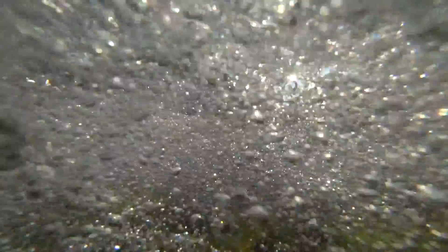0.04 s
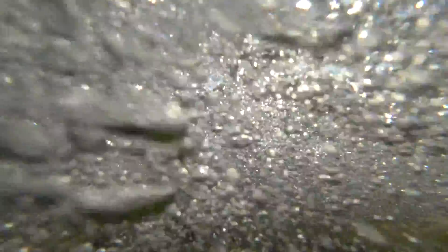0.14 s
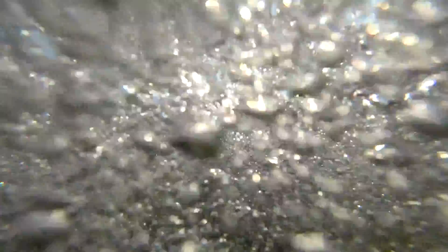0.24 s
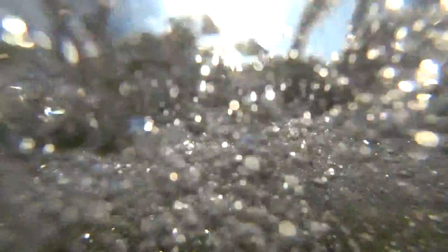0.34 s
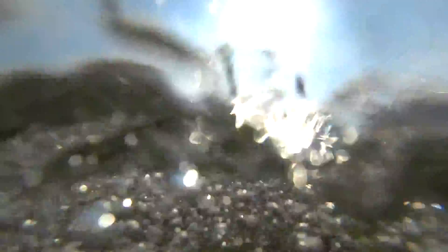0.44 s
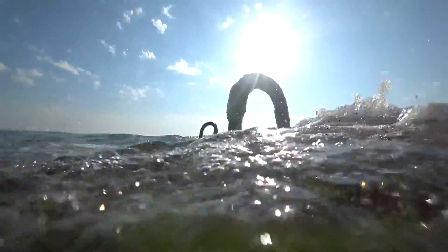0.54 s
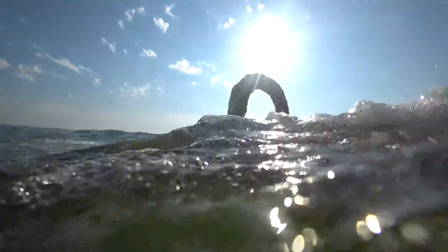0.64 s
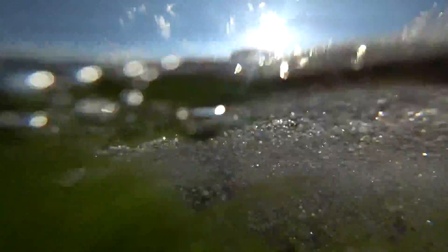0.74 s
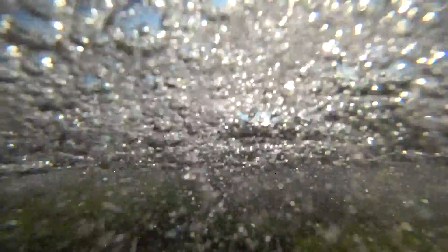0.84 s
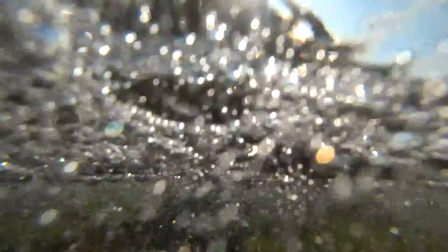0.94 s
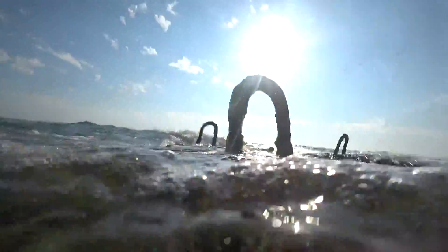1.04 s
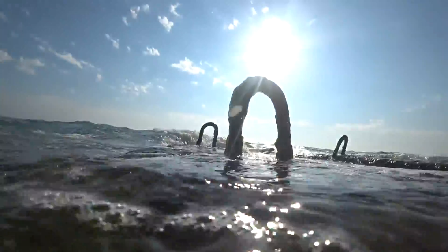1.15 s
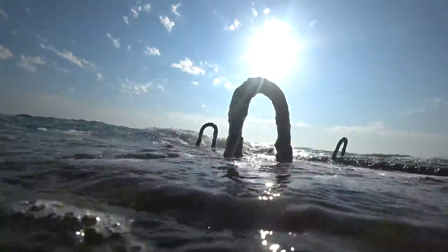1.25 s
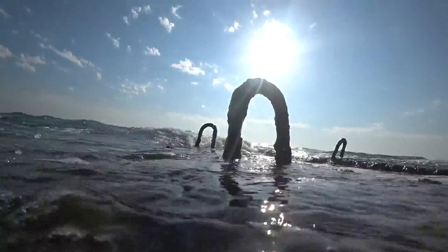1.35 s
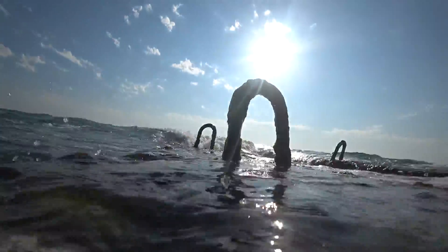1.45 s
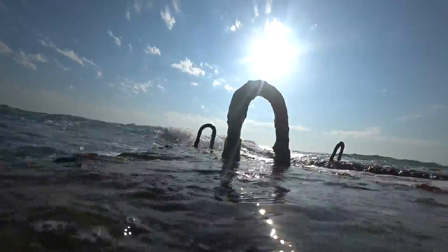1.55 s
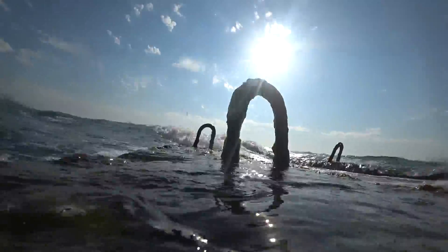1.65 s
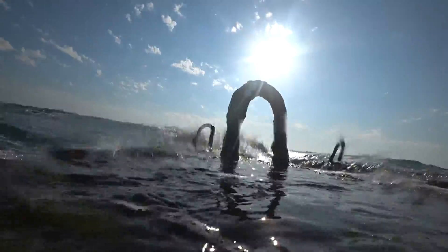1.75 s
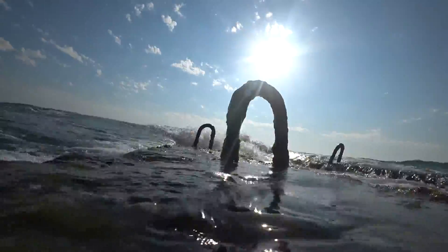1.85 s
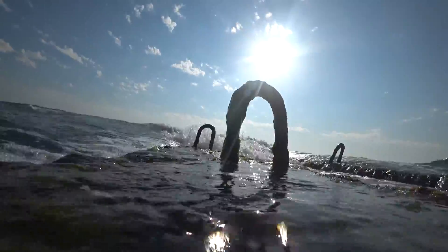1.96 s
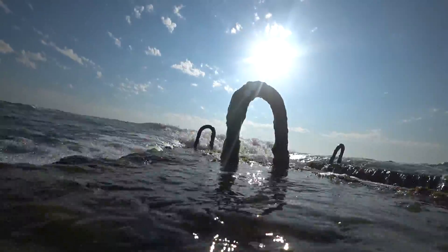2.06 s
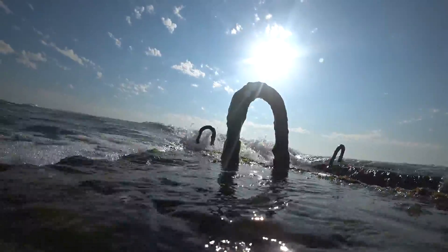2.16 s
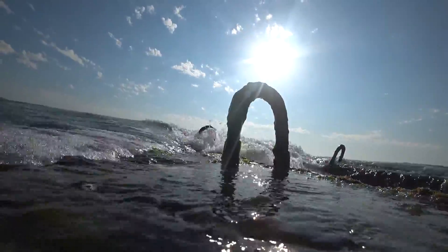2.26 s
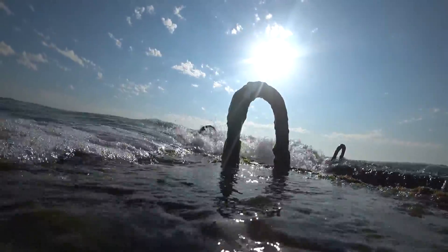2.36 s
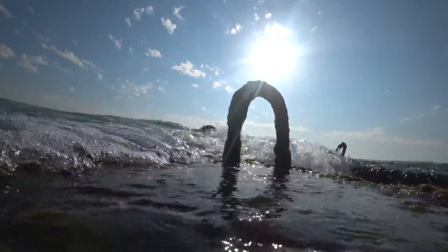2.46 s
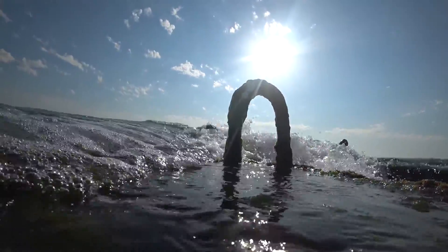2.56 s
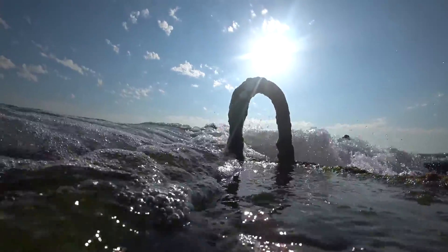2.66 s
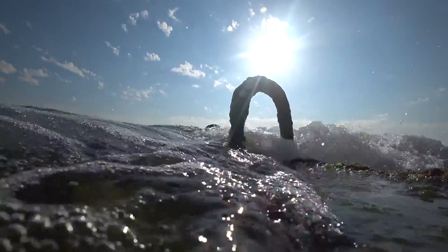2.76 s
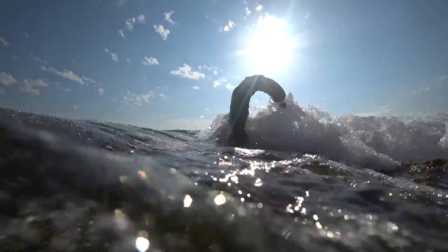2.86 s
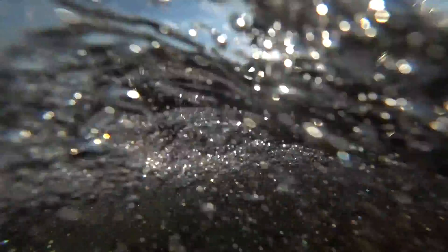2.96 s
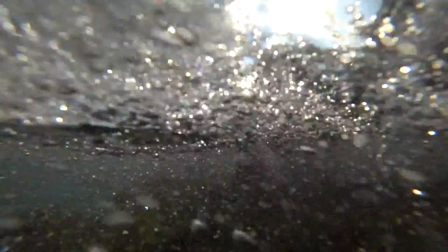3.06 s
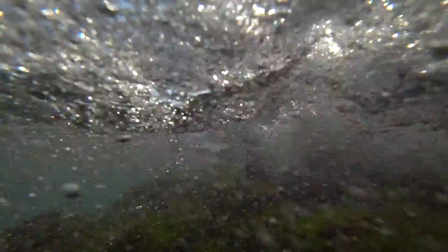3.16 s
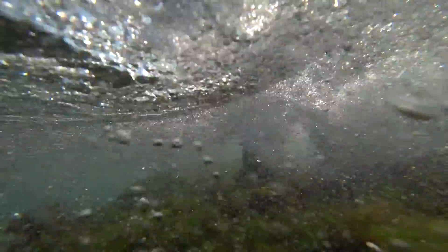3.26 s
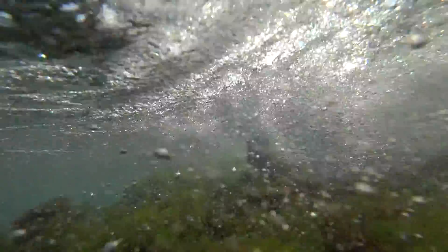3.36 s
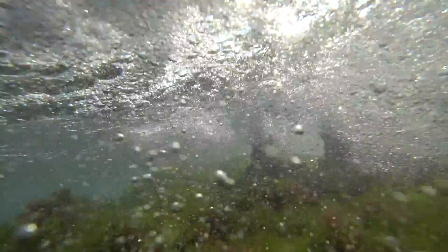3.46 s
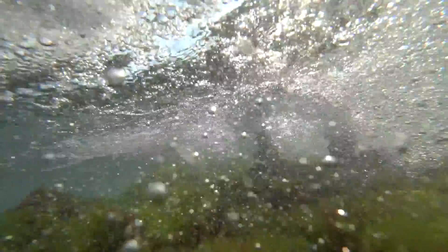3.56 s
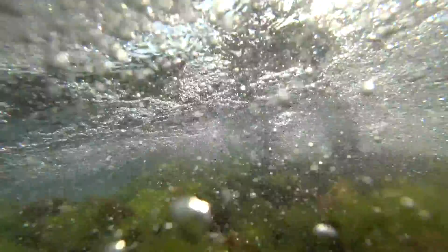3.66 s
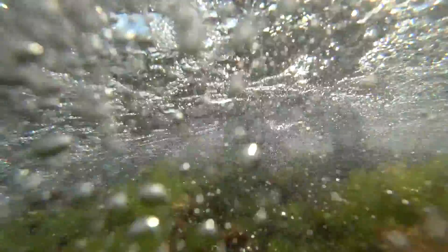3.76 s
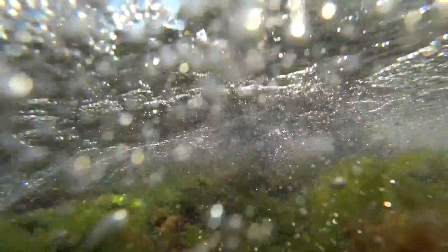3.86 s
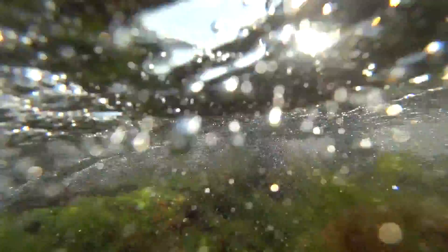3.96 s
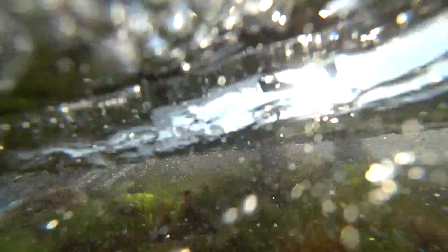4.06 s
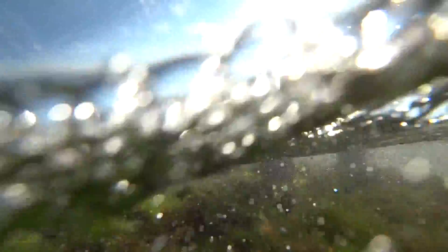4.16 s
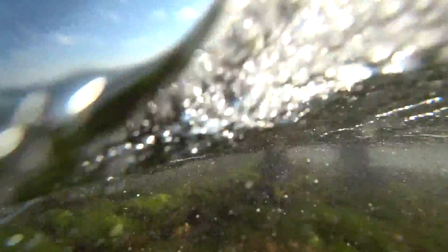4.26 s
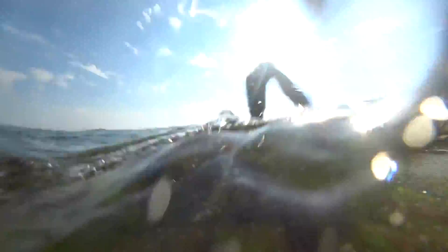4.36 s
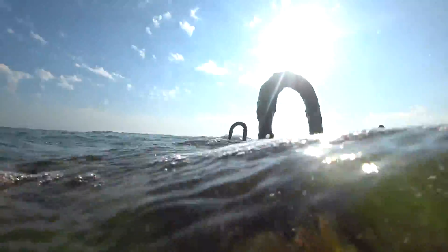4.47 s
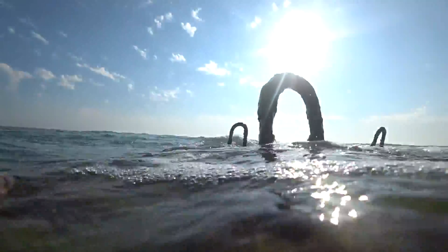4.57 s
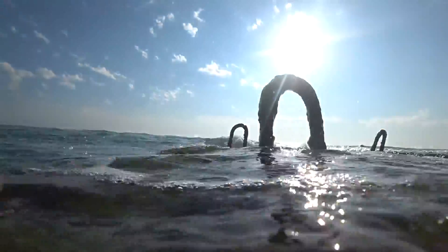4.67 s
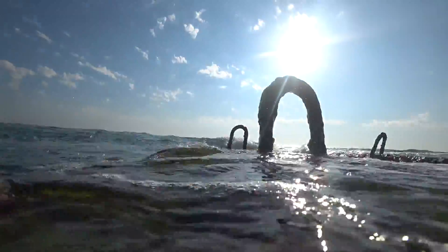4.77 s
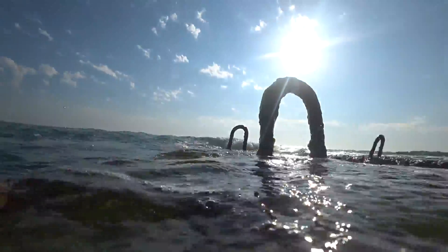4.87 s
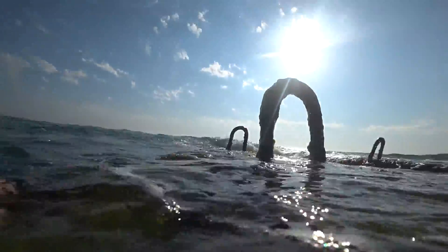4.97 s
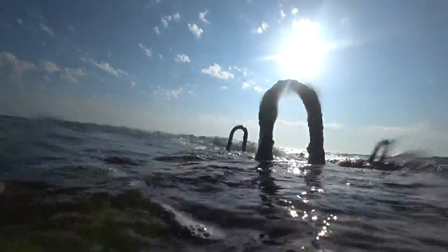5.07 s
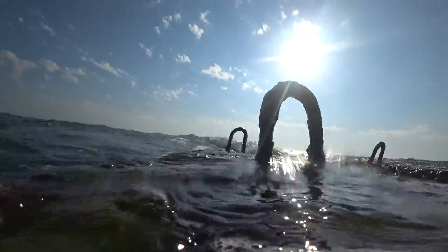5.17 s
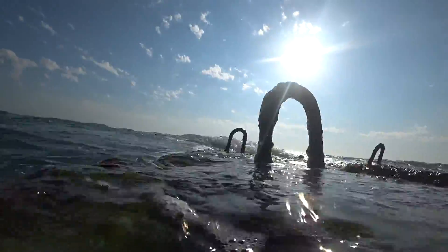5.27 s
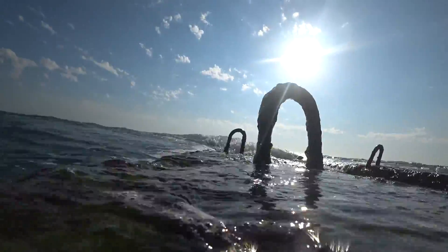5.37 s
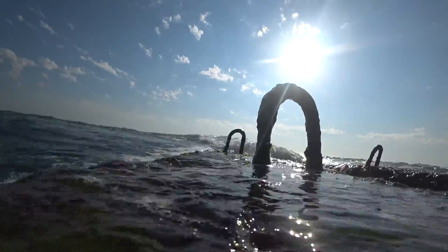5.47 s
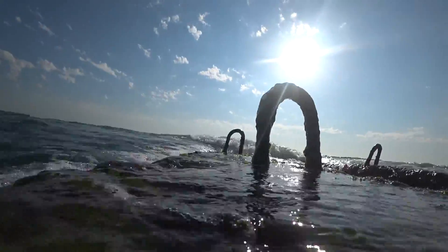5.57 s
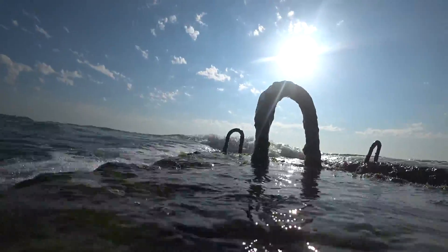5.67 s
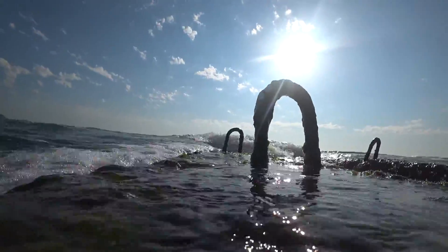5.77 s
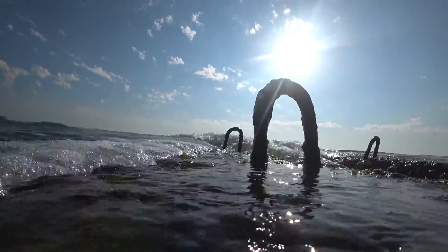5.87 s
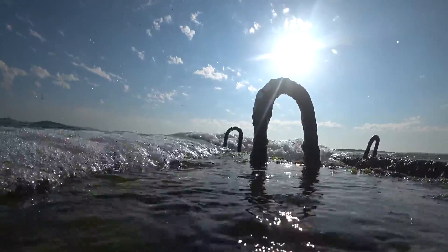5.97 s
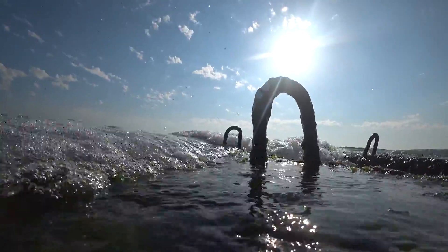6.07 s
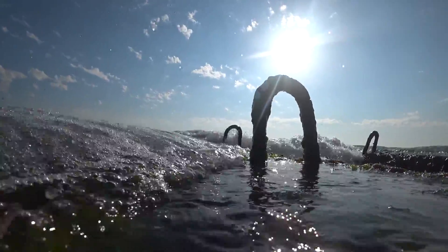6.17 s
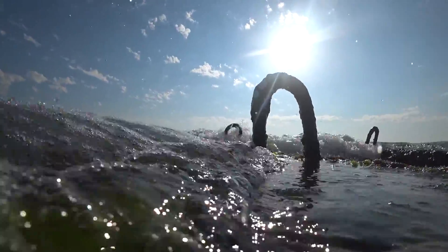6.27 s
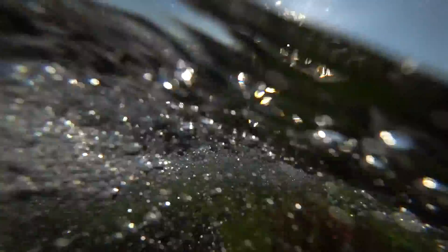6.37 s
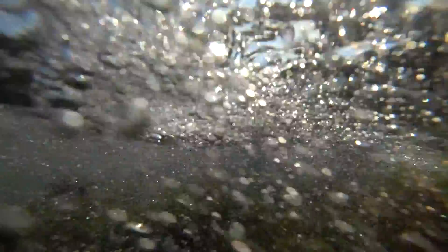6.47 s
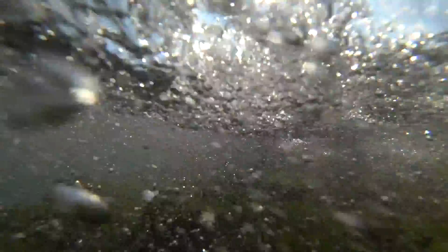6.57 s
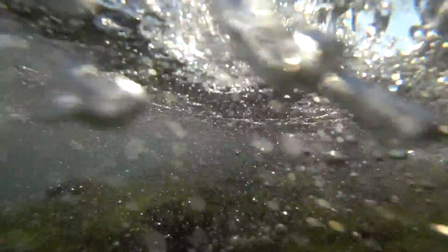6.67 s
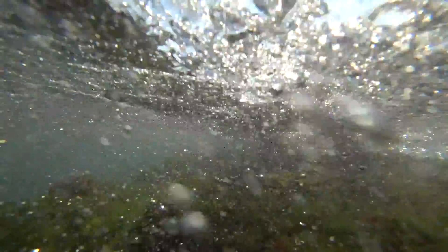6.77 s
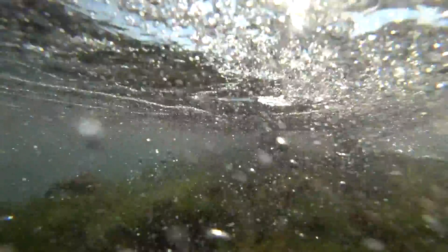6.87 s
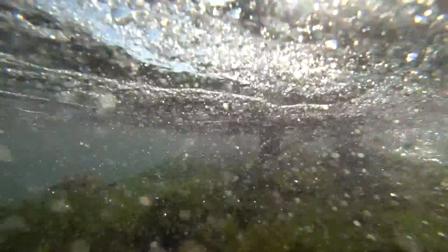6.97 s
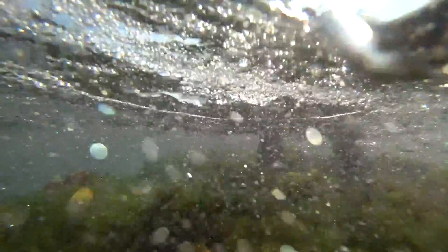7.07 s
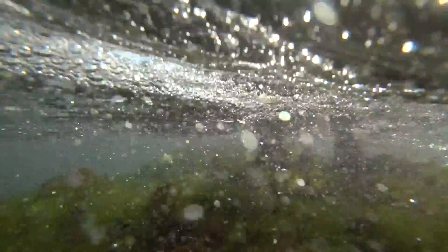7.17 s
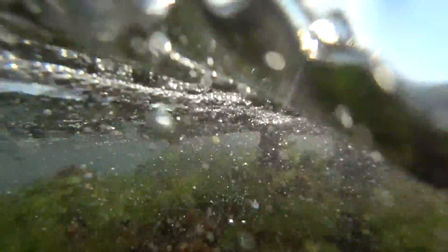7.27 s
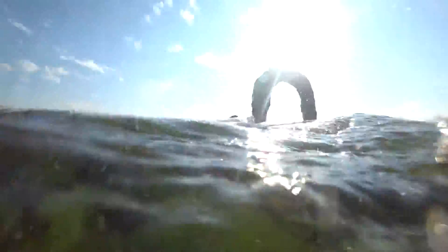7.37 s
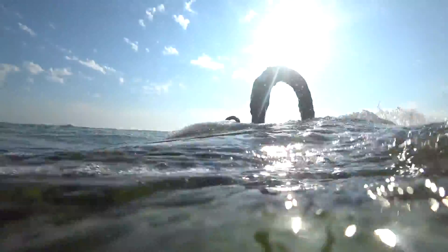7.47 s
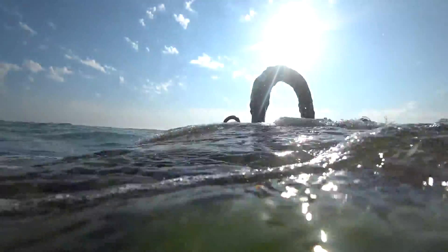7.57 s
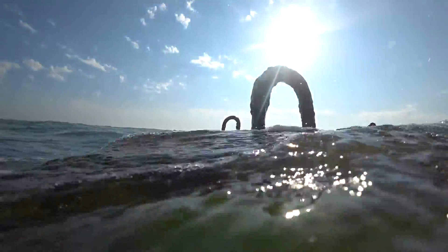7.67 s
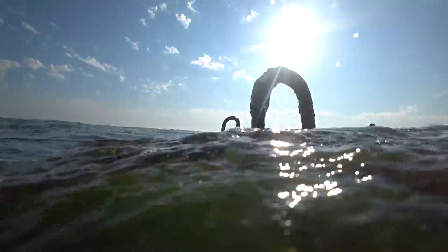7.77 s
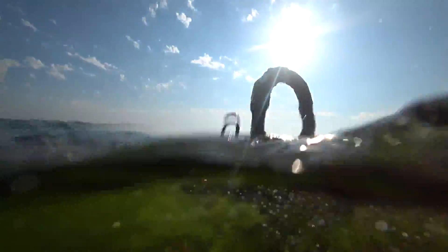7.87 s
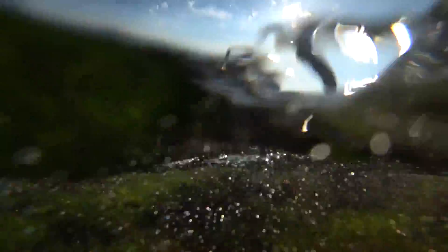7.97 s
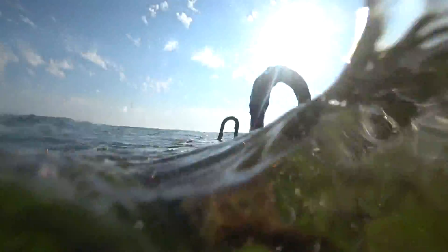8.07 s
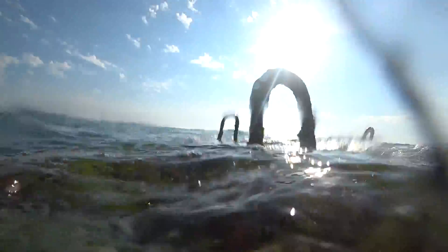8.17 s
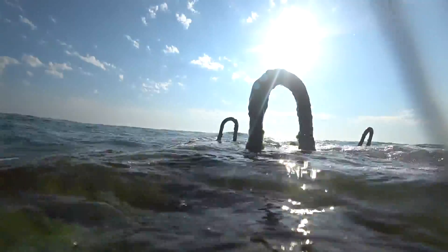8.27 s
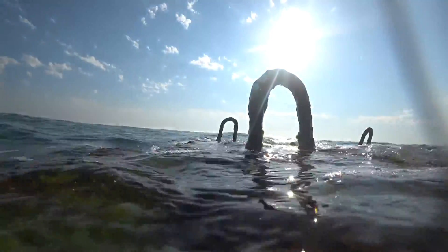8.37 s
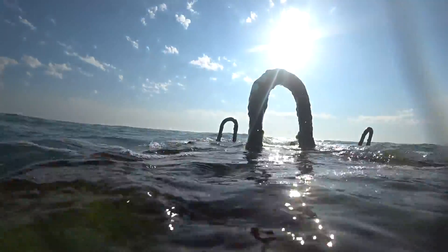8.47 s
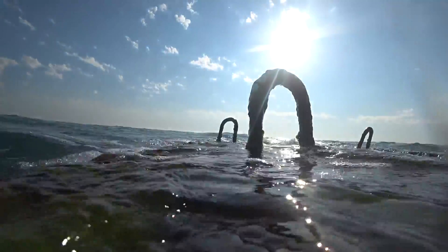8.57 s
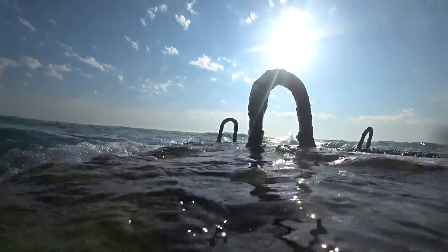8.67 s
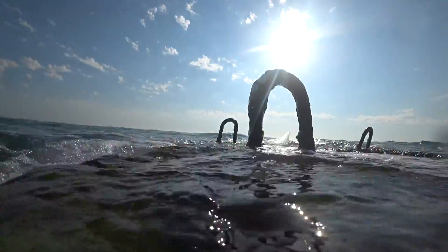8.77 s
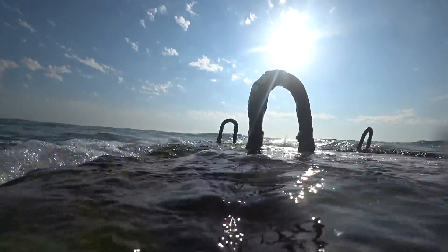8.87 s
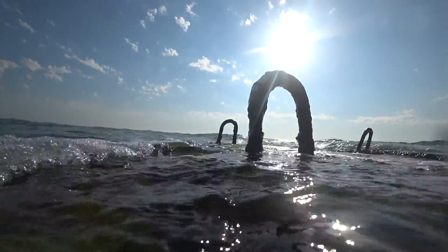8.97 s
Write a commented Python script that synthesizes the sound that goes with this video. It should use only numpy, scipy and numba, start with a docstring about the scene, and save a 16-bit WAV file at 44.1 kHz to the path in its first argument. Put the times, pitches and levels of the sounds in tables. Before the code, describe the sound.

A sealed camera sits at the waterline of a weedy, rocky shore, hearing through its case. At 0 s it is already submerged: a wave front bursts, with throaty mid-pitched gurgles, fizz and bright ticks, thinning by 0.6 s. A brief glug and splash at 0.85-1.2 s ends in a knock. Then quiet until 2.8 s: low swell rumble, faint boxy surf and hiss. From 2.9 s a big surge gurgles densely, strongest near 3.3 s, fading by 3.8 s. Two heavy, overloading thumps hit around 4.2 s with scattered bubbles, and a pocket sweeps upward near 4.5 s. Water drains with thin, sagging singing; small slaps land at 5.1-5.6 s. At 6.3 s another front crashes, slaps and boils with fizz and sharp snaps until about 7.4 s. After a lull, short glugs and a tick at 8 s give way to muffled calm and faint draining to about 9 s.

```python
"""Rocks at the waterline, where small waves break and wash over a sealed camera; it hears through its case.
Under water, crowds of air pockets gurgle and small bubbles tick on the case: damped sines that mostly
climb in pitch. Wave fronts burst on it as coloured noise, water slaps it, and runs off with a thin singing.
Between surges the far surf hums in the case's resonances and the swell rumbles, both filtered noise.
The camera widens its stereo and clips."""
import sys
import numpy as np
from scipy import signal
from scipy.fft import rfft, irfft, next_fast_len
from scipy.io import wavfile
from scipy.ndimage import map_coordinates
from numba import njit

SR = 44100
rng = np.random.default_rng(int(sys.argv[2]) if len(sys.argv) > 2 else 0)


def volts_from_db(level):
    """Convert decibel levels to linear amplitude ratios."""
    exponent = np.asarray(level, float) / 20
    return 10 ** exponent


def wav_out(sig):
    """Save sig, one row per channel (or a flat mono array), as 16-bit PCM at SR to the path in sys.argv[1]."""
    wavfile.write(sys.argv[1], SR, np.round(np.clip(np.atleast_2d(sig).T, -1, 1) * 32767).astype(np.int16))


N = 397782  # samples

# surges over the camera, one list each:
# (time [s], gurgle level before clumping [dB], centre pitch of the pockets [Hz], fizz level [dB])
SURGES = [
    [(0.0, -28.5, 536, -43.5), (0.03, -28, 670, -43), (0.122, -30, 776, -60), (0.214, -30, 552, -48.5),
     (0.306, -28.5, 611, -53), (0.468, -43.5, 700, -66), (0.6, -63, 654, -63)],
    [(0.84, -48, 610, -58), (0.922, -65, 670, -75), (0.95, -41, 460, -60), (1.14, -54, 680, -61)],
    [(2.86, -74, 654, -62), (2.936, -37.5, 535, -37.5), (3.056, -44, 593, -46.5), (3.142, -31, 465, -36),
     (3.306, -22, 644, -43.5), (3.34, -22.5, 520, -41.5), (3.508, -33, 644, -55), (3.64, -42.5, 550, -69),
     (3.82, -53, 700, -67)],
    [(4.05, -58, 630, -82), (4.128, -47.5, 835, -54.5), (4.222, -56, 530, -52), (4.328, -58, 867, -52.5),
     (4.412, -50, 570, -54.5), (4.55, -51, 804, -72)],
    [(6.29, -85, 535, -68), (6.394, -72, 653, -51), (6.456, -42, 464, -37), (6.5, -34.5, 610, -38.5),
     (6.558, -28, 507, -40.5), (6.716, -27, 648, -33.5), (6.814, -28, 555, -39.5), (7.13, -41.5, 609, -52),
     (7.16, -39, 835, -55), (7.4, -50, 686, -55)],
    [(7.92, -63, 660, -60), (8.096, -60.5, 660, -65), (8.164, -56, 750, -65), (8.22, -59, 613, -75)],
]
# the sea between surges, one list for each lull:
# (time [s], swell rumble [dB], low surf [dB], ring of the case [dB], hiss [dB]), before any flicker
SEA = [
    [(0.6, -46, -57, -63, -61), (0.646, -44.5, -54, -61, -58), (0.892, -42.5, -56.5, -69, -50.5),
     (1.0, -48, -53.5, -67, -60)],
    [(1.27, -48, -54, -63.5, -59), (1.56, -49.5, -58.5, -56, -61), (2.392, -45.5, -60.5, -67, -62.5),
     (2.78, -47, -57.5, -60, -60.5)],
    [(3.86, -42.5, -53, -70, -67), (3.964, -41.5, -54.5, -67, -63), (4.03, -41, -55, -72, -59.5)],
    [(4.58, -43, -57.5, -66, -65), (4.854, -45, -58, -66, -63), (4.984, -42, -50, -61, -63.5),
     (5.08, -44, -56.5, -54, -59.5)],
    [(5.32, -45, -55.5, -58.5, -63), (5.53, -48, -59, -62.5, -65), (5.76, -44, -56.5, -57.5, -60),
     (6.27, -50, -59.5, -60.5, -61)],
    [(7.45, -43, -57, -73, -64), (7.644, -45, -61, -68, -62), (7.75, -49.5, -57.5, -62, -60),
     (7.88, -47.5, -56, -61, -63)],
    [(8.28, -42.5, -59.5, -74, -64.5), (8.552, -49.5, -60, -59.5, -62), (8.748, -51, -65, -60.5, -62.5),
     (9.02, -48, -59, -64, -63)],
]
# water heaving against the case: (time of the peak [s], rumble [dB], slosh [dB])
HEAVES = [(.06, -36.5, -29.5), (0.942, -38.5, -30.5), (1.21, -32.5, -44), (2.915, -32.5, -29),
          (3.14, -27.5, -25), (3.24, -55, -46), (4.187, -26.5, -30), (4.65, -48, -91), (5.22, -43, -60),
          (5.57, -40, -62), (6.37, -22, -26.5), (8.015, -41, -34.5)]
# colour of the churn and of a wave front's body: (frequency [Hz], relative level per Hz [dB])
BODY_COLOUR = [(180, -52.5), (300, -14.5), (624, 4.5), (670, 2), (1420, -7.5), (2600, -45), (3380, -56),
               (5720, -120)]
# colour of the fizz, as the case passes it: (frequency [Hz], relative level per Hz [dB])
FIZZ_COLOUR = [(880, -59), (1500, 3), (1680, -15.5), (1980, -0.5), (2330, -11), (2730, -3), (3720, -11),
               (4250, -3.5), (5050, -4), (9000, -30.5), (11700, -54), (19800, -120)]
# colour of the spray: (frequency [Hz], relative level per Hz [dB])
SPRAY_COLOUR = [(4710, -7.5), (8000, -3), (9100, -13), (9810, -2), (10300, 2), (11300, -10), (12000, -16),
                (15600, -57), (22000, -120)]
# colour of the swell's rumble: (frequency [Hz], relative level per Hz [dB])
RUMBLE_COLOUR = [(12, 0.5), (20, 7), (29, 5.5), (82, -8.5), (134, -18.5), (162, -20), (250, -25),
                 (320, -24), (550, -120)]
STRONG_DB = -26  # a strong gurgle


def unit(x):
    """Scaled to rms 1."""
    return x / np.sqrt(np.mean(x ** 2) + 1e-20)


def along(points, hz):
    """Reads (Hz, value) points on a log frequency axis."""
    f, v = np.transpose(points)
    return np.interp(np.log(hz + 1), np.log(f + 1), v)


def curves(rows):
    """One value per sample for each column after the time."""
    s, *columns = np.transpose(rows)
    return [np.interp(np.arange(N) / SR, s, column) for column in columns]


def during(tables):
    """1 inside each table's time span, with a 1 ms fade in and a 20 ms fade out."""
    t = np.arange(N) / SR
    gain = np.zeros(N)
    for rows in tables:
        first, last = rows[0][0], rows[-1][0]
        gain += np.interp(t, [first, first + 0.00093, last - 0.02, last], [0, 1, 1, 0], 0, 0)
    return gain


def humps(s, db, rise_s, fall_s):
    """Summed gains that climb 40 dB to each peak and sink 40 dB after it."""
    t = np.arange(N) / SR
    gain = np.zeros(N)
    for at, peak, up, down in np.broadcast(s, db, rise_s, fall_s):
        level_db = np.interp(t, [at - up, at, at + down], [peak - 40, peak, peak - 40], -200, -200)
        gain += volts_from_db(level_db)
    return gain


def wobble(rate):
    """A smooth random curve, rate knots a second."""
    return map_coordinates(rng.standard_normal(int(N * rate / SR) + 4), [np.arange(N) * rate / SR])


def filtered(x, response):
    """x times a complex response of frequency."""
    m = next_fast_len(N + SR // 2)
    return irfft(rfft(x, m) * response(np.fft.rfftfreq(m, 1 / SR)), m)[..., :N]


def coloured(x, colour):
    """x filtered by a table of (Hz, dB)."""
    return filtered(x, lambda hz: volts_from_db(along(colour, hz)))


def rush(colour, flicker_db, rate):
    """Coloured noise of rms 1 whose level flickers."""
    x = coloured(rng.standard_normal(N), colour)
    return unit(x * volts_from_db(flicker_db * wobble(rate)))


@njit
def bubbles(start, hz, t60, gain, rise, attack, sr, n):
    """Damped sines with a short attack whose pitch drifts by 2 * rise of itself as they die 60 dB."""
    out = np.zeros(n)
    for k in range(len(start)):
        for i in range(min(int(t60[k] * sr), n - start[k])):
            t = i / sr
            turn = 2 * np.pi * hz[k] * t * (1 + rise[k] * t / t60[k])
            decay = 10 ** (-3 * t / t60[k])
            onset = 1 - np.exp(-t * hz[k] / attack)  # attack in cycles
            out[start[k] + i] += gain[k] * np.sin(turn) * decay * onset
    return out


def swarm(count, centre_hz, spread, cycles, size_db, rise):
    """Random bubbles of rms 1: log-normal pitch, few loud and many faint, some cycles long."""
    u, g = rng.random((count, 2)), rng.standard_normal((count, 3))
    start = (u[:, 0] * (N - 1)).astype(np.int64)
    hz = np.clip(centre_hz[start] * np.exp(spread * g[:, 0]), 60, 11000)
    t60 = cycles / hz * np.exp(0.585 * g[:, 1])
    gain = volts_from_db(-size_db * np.log(u[:, 1] + 0.04)) * np.sign(g[:, 2])
    drift = rise * (1 + 0.69 * g[:, 2])
    return unit(bubbles(start, hz, t60, gain, drift, 0.46, SR, N))


def pops(s, db, hz, t60, rise, attack):
    """Single damped sines at given moments."""
    s, db, hz, t60, rise = np.broadcast_arrays(s, db, hz, t60, rise)
    start = (s * SR).astype(np.int64)
    return bubbles(start, hz * 1., np.clip(t60, 0.002, 0.2), volts_from_db(db), rise * 1., attack, SR, N)


def surge():
    """Foam sweeps past: crowds of pockets gurgle, water sloshes, droplets ping, fine bubbles fizz in clumps."""
    gurgle_db, pocket_hz, fizz_db = curves(np.concatenate(SURGES))
    heave_s, _, heave_slosh_db = np.transpose(HEAVES)
    clumps = np.tanh(wobble(70) / 2) * 2  # foam arrives in clumps, all sizes together

    pockets = swarm(count=2600, centre_hz=pocket_hz, spread=0.227, cycles=22.4, size_db=3.0, rise=0.174)
    churn = rush(BODY_COLOUR, flicker_db=3.5, rate=44)  # between the pockets
    gurgle = unit(pockets + 0.59 * churn)

    slosh = swarm(count=900, centre_hz=np.full(N, 210.), spread=0.59, cycles=1.54, size_db=4.5, rise=0.11)
    following = volts_from_db(-41 + 1.3 * (gurgle_db - STRONG_DB))  # grows faster than the gurgle
    slosh = slosh * (following + humps(heave_s, heave_slosh_db, rise_s=0.094, fall_s=0.18))

    droplets = swarm(count=5000, centre_hz=np.full(N, 1300.), spread=0.373, cycles=7.9, size_db=4.5, rise=0.089)
    droplets_db = 1.5 + gurgle_db + 0.68 * (fizz_db - gurgle_db)  # a blend of gurgle and fizz

    pings = swarm(count=3000, centre_hz=np.full(N, 4000.), spread=0.368, cycles=34, size_db=4.5, rise=0.15)
    grit = volts_from_db(5.2 * clumps + 3.6 * wobble(150)) * rng.standard_normal(N)
    fizz = unit(unit(coloured(grit, FIZZ_COLOUR)) + 0.96 * volts_from_db(4 * clumps) * pings)
    spray = unit(coloured(grit, SPRAY_COLOUR))
    splatter = swarm(count=900, centre_hz=np.full(N, 2600.), spread=0.607, cycles=4.8, size_db=2, rise=0.15)

    low = volts_from_db(gurgle_db + 1.66 * clumps) * gurgle + volts_from_db(droplets_db + 5.2 * clumps) * droplets + slosh
    high = volts_from_db(fizz_db) * (fizz + volts_from_db(-24.5) * spray + volts_from_db(-6.5) * splatter)
    return during(SURGES) * (low + high)


def crashes():
    """The front of a wave bursts on the case: dense, rough noise in three colours."""
    # one list for each front: (time [s], body level [dB], treble level [dB], spray level [dB])
    fronts = [
        [(0.01, -51, -34, -86), (0.1, -23.5, -42, -43), (0.12, -18, -59, -66)],
        [(6.305, -63, -66.5, -71), (6.319, -26, -29, -33), (6.42, -33.5, -32.5, -60)],
    ]
    body_db, treble_db, spray_db = curves(np.concatenate(fronts))
    body = volts_from_db(body_db) * rush(BODY_COLOUR, flicker_db=0.5, rate=59)
    treble = volts_from_db(treble_db) * rush(FIZZ_COLOUR, flicker_db=5, rate=110)
    spray = volts_from_db(spray_db) * rush(SPRAY_COLOUR, flicker_db=6.5, rate=150)
    return during(fronts) * (body + (treble + spray))


def glugs():
    """Big air pockets, and a few low knocks with the slaps, ring, waver and start with a short rough snap."""
    # big air pockets, and a few low knocks that sound with the slaps:
    # (time [s], ring level [dB], starting pitch [Hz], t60 [s], snap level [dB])
    pockets_and_knocks = [(0.051, -17, 668, 0.05, -30), (0.095, -20, 877, 0.042, -27),
                          (0.23, -15, 558, 0.062, -39), (0.259, -15.5, 647, 0.076, -33),
                          (0.325, -12.5, 645, 0.081, -36), (0.404, -25.5, 620, 0.053, -36),
                          (0.421, -17.5, 630, 0.039, -45), (0.521, -34.5, 600, 0.029, -44),
                          (0.85, -33.5, 555, 0.041, -37), (0.879, -21.5, 554, 0.027, -36),
                          (0.907, -17.5, 880, 0.03, -38), (0.954, -19, 383, 0.05, -38),
                          (1.069, -28, 585, 0.033, -50), (1.196, -9.5, 340, 0.026, -50),
                          (2.879, -17, 650, 0.024, -22), (2.905, -14.5, 579, 0.054, -25),
                          (2.943, -11.5, 466, 0.044, -27), (2.985, -17, 628, 0.04, -25),
                          (3.035, -13, 570, 0.066, -26.5), (3.101, -22.5, 540, 0.05, -36),
                          (3.135, -17, 440, 0.05, -32), (3.154, -10.5, 402, 0.069, -27),
                          (3.232, -12.5, 444, 0.071, -30), (3.282, -19, 746, 0.093, -39),
                          (3.335, -11, 480, 0.054, -35), (3.393, -14.5, 535, 0.11, -32),
                          (3.526, -23, 563, 0.1, -43), (3.567, -27.5, 595, 0.069, -43),
                          (3.661, -27.5, 437, 0.057, -40), (4.067, -16, 604, 0.019, -23),
                          (4.093, -19, 850, 0.017, -29), (4.113, -22.5, 800, 0.025, -55),
                          (4.133, -25, 862, 0.042, -45), (4.171, -29, 323, 0.04, -32),
                          (4.282, -28, 600, 0.025, -34.5), (4.315, -23.5, 870, 0.027, -26),
                          (4.368, -32, 917, 0.038, -31), (4.404, -22.5, 557, 0.062, -54),
                          (4.445, -23, 926, 0.026, -39.5), (5.152, -29.5, 366, 0.055, -45),
                          (5.214, -29, 290, 0.045, -52), (5.554, -25, 295, 0.038, -51),
                          (6.361, -21, 610, 0.039, -30), (6.402, -19.5, 966, 0.038, -35),
                          (6.46, -13, 452, 0.035, -21), (6.498, -11, 562, 0.067, -30),
                          (6.545, -11, 910, 0.029, -37), (6.558, -11, 453, 0.088, -34),
                          (6.602, -13.5, 560, 0.05, -29), (6.639, -16, 882, 0.035, -29),
                          (6.662, -12.5, 528, 0.075, -28), (6.708, -23, 570, 0.034, -21),
                          (6.727, -27, 540, 0.043, -18), (6.757, -19, 560, 0.061, -33),
                          (6.814, -15.5, 523, 0.054, -15.5), (6.881, -17.5, 516, 0.05, -18.5),
                          (6.919, -21, 566, 0.069, -25), (7.056, -22, 573, 0.061, -28),
                          (7.177, -19, 950, 0.049, -48), (7.277, -24.5, 692, 0.079, -32),
                          (7.319, -15, 773, 0.047, -20), (7.538, -38, 676, 0.033, -58),
                          (7.948, -25.5, 576, 0.027, -25), (7.961, -29, 659, 0.05, -52),
                          (8.017, -13.5, 636, 0.044, -47), (8.036, -20.5, 619, 0.041, -36),
                          (8.067, -20.5, 633, 0.038, -24.5)]
    # a pocket rising to the surface, its pitch sweeping up:
    # (time [s], level [dB], starting pitch [Hz], t60 [s], climb [half the rise over t60, share of pitch])
    rising_pocket = [(4.466, -25, 554, 0.093, 1.4)]
    s, db, hz, t60, snap_db = np.transpose(pockets_and_knocks)
    chance = rng.standard_normal((len(s), 2))
    ring = pops(s, db, hz, t60, 0.094 + 0.076 * chance[:, 0], attack=0.14)  # mostly climbs in pitch
    ring = ring + pops(*np.transpose(rising_pocket), attack=0.73)
    snap_hz = 1400 * np.exp(0.132 * chance[:, 1])
    snap = pops(s, snap_db, snap_hz, t60=0.032, rise=0.079, attack=1.0)
    waver = volts_from_db(2.6 * wobble(130))  # a pocket wobbles in shape as it rings
    return ring * waver + snap * (0.9 + 0.94 * wobble(900))


def ticks():
    """Small bubbles snap: a short ping, a splash of noise in the case's colour and a spit of top treble."""
    # small bubbles snapping on the case: (time [s], ping level [dB], starting pitch [Hz])
    snapping = [(0.0231, -15.5, 5180), (0.0626, -19.5, 3520), (0.0807, -21, 2730), (0.0934, -16.5, 5540),
                (0.1765, -22, 3280), (0.2037, -24, 3040), (0.244, -34, 1800), (0.2467, -19.5, 3230),
                (0.383, -30.5, 4630), (0.9064, -32, 4400), (0.9467, -32, 3130), (0.9638, -17.5, 3130),
                (1.0799, -31.5, 5100), (2.8128, -32, 5170), (2.879, -25, 1800), (2.8802, -16.5, 2110),
                (2.9021, -19.5, 2830), (2.939, -26, 2200), (2.9524, -18, 5300), (2.9726, -21, 5630),
                (2.996, -26, 4700), (3.0145, -28, 4430), (3.0295, -24, 2060), (3.1014, -25, 2010),
                (3.109, -21, 2650), (3.1508, -28, 4640), (3.177, -19, 2660), (3.2048, -15, 1880),
                (3.24, -25, 2680), (3.3353, -32, 1830), (3.338, -23, 2120), (3.3665, -15.5, 2150),
                (3.4407, -27.5, 4860), (3.488, -25, 1940), (3.595, -31.5, 1860), (3.6108, -25.5, 6150),
                (3.6589, -31, 3000), (3.772, -36, 5200), (3.789, -28.5, 4920), (4.0699, -23.5, 1840),
                (4.0945, -19.5, 2210), (4.141, -24.5, 4060), (4.1738, -29.5, 2750), (4.2428, -32, 4920),
                (4.2816, -26, 2730), (4.3133, -30, 1900), (4.3375, -23.5, 4470), (4.3675, -24.5, 4400),
                (4.4458, -37, 1980), (4.4961, -19.5, 5260), (6.3178, -24, 3730), (6.3275, -16, 5070),
                (6.3688, -22, 1950), (6.3994, -14.5, 4980), (6.4368, -25, 3220), (6.4526, -21.5, 5180),
                (6.486, -18, 1870), (6.537, -31, 4590), (6.5508, -13, 4940), (6.6184, -19.5, 1910),
                (6.6712, -19.5, 5440), (6.7096, -18, 1870), (6.7428, -14, 1930), (6.8369, -28, 1850),
                (6.8545, -20, 4440), (6.889, -30.5, 2040), (6.9126, -20.5, 5940), (6.9326, -18.5, 5200),
                (6.9565, -9.5, 4350), (7.0574, -14, 2740), (7.104, -23, 1890), (7.1247, -18, 5120),
                (7.227, -12.5, 4170), (7.2553, -21.5, 2730), (7.2674, -22, 1940), (7.3165, -27, 1920),
                (7.4003, -38, 3800), (7.5387, -34, 5130), (7.9486, -35, 1960), (7.9977, -32.5, 5600),
                (8.03, -12.5, 2640), (8.0671, -25.5, 2040), (8.1472, -25, 4680), (8.1736, -24, 4360)]
    # extra top treble on the brightest ticks: (time [s], level [dB])
    bright_tops = [(0.963, -37), (1.079, -26), (2.953, -27), (3.441, -34), (4.4957, -44), (6.319, -17),
                   (6.654, -32), (7.057, -32), (7.1037, -22.5), (8.0292, -49)]
    s, db, hz = np.transpose(snapping)
    ping = pops(s, db, hz, t60=0.012, rise=0.032, attack=0.1)
    splash = coloured(np.abs(ping) * rng.standard_normal(N), FIZZ_COLOUR)
    top_db = db - 34 - rng.standard_normal(len(s))  # scattered by 1 dB
    top = spits(s, top_db) + spits(*np.transpose(bright_tops))
    return ping + volts_from_db(6.5) * splash + top


def spits(s, db):
    """Very short pings near the top of the microphone's range."""
    hz = 10200 * np.exp(0.048 * rng.standard_normal(len(s)))
    return pops(s, db, hz, t60=0.0071, rise=0.01, attack=0.77)


def slaps():
    """Water slaps the case: a short, higher knock together with a slow push that dies in a few cycles."""
    # water slaps: (time [s], push level [dB], starting pitch [Hz], t60 [s])
    slapping = [(1.181, -23.5, 61.3, 0.26), (2.9, -21, 93.5, 0.065), (4.175, -6, 79, .031),
                (4.194, -5.5, 57.5, 0.026), (4.658, -27, 60.6, .096), (5.109, -16.5, 120, 0.014),
                (5.152, -16.5, 189, .04), (5.158, -17, 104, 0.024), (5.21, -14.5, 121, 0.023),
                (5.215, -16, 62, 0.025), (5.291, -17, 61, 0.021), (5.555, -12.5, 95.5, 0.057),
                (6.35, -7, 75, 0.016)]
    s, db, hz, t60 = np.transpose(slapping)
    push = pops(s, db, hz, t60, rise=0.29, attack=0.086)
    knock = pops(s, db - 9.5, 487, t60=0.0094, rise=0.23, attack=0.12)
    return push + knock


def drain():
    """Water draining off sings: tiny bubbles of nearly one size, ringing long, sagging in pitch."""
    # narrow-band singing: (time of the peak [s], peak level [dB], pitch at the peak [Hz], rise [s], fall [s])
    singing = [(4.52, -55, 2620, .05, 1.44), (5.956, -55.5, 2480, .28, 0.37),
               (7.69, -56.5, 2570, 0.28, 0.2), (8.22, -58, 2410, 0.11, 1.24)]
    sag_hz_per_s = 210
    s, db, hz, rise_s, fall_s = np.transpose(singing)
    t = np.arange(N) / SR
    latest = np.clip(np.searchsorted(s - rise_s, t) - 1, 0, None)
    pitch_hz = hz[latest] - sag_hz_per_s * np.clip(t - s[latest], -1, 1)
    level = humps(s, db, rise_s, fall_s)
    return level * swarm(count=4000, centre_hz=pitch_hz, spread=0.051, cycles=28, size_db=3.5, rise=0.018)


def ports(slap):
    """Swell, most under a surge, and a share of each slap push one microphone port and pull the other."""
    swell_share = volts_from_db(-21 + 8.6 * during(SURGES))
    uneven = swell() * swell_share * rush(RUMBLE_COLOUR, flicker_db=6.0, rate=10) + 0.24 * slap
    return np.array([uneven, -uneven])


def sea():
    """Swell rumbles in lumps; far surf comes through the case's resonances with sparse drops."""
    # colour of the low surf: (frequency [Hz], relative level per Hz [dB])
    low_colour = [(120, -38), (200, -19.5), (476, -11), (518, -12.5), (608, -7.5), (839, -8.5),
                  (1030, -2.5), (1250, -20), (1620, -65), (2750, -120)]
    # colour of the case's ring: (frequency [Hz], relative level per Hz [dB])
    ring_colour = [(720, -75), (1220, -25.5), (1420, -4), (1580, -10.5), (1760, -21), (1850, -36),
                   (2400, -40), (4070, -120)]
    # colour of the hiss: (frequency [Hz], relative level per Hz [dB])
    hiss_colour = [(2060, -49), (3500, -5), (5130, 2), (5730, -4.5), (8400, -17), (9240, -19.5),
                   (10600, -14), (11200, -19), (11500, -66), (15000, -81), (22000, -120)]
    # colour of the wash: (frequency [Hz], relative level per Hz [dB])
    wash_colour = [(1060, -15), (1800, -0.5), (2190, -2), (2810, -1.5), (3110, -5), (3500, -14),
                   (4550, -72), (7700, -120)]
    _, low_db, ring_db, hiss_db = curves(np.concatenate(SEA))
    drops = swarm(count=400, centre_hz=np.full(N, 4200.), spread=0.52, cycles=11.0, size_db=0.0, rise=0.067)
    hiss = unit(rush(hiss_colour, flicker_db=0.6, rate=30) + 0.3 * drops)
    rumble = swell() * volts_from_db(0.86 * wobble(3.01)) * rush(RUMBLE_COLOUR, flicker_db=1.0, rate=17)
    low = volts_from_db(low_db + 0.73 * wobble(2.2)) * rush(low_colour, flicker_db=2.5, rate=24)
    ring = volts_from_db(ring_db) * rush(ring_colour, flicker_db=1.5, rate=20)
    # the wash follows the hiss, a little less steeply
    wash_db = -63.5 + 0.9 * (hiss_db - hiss_db.mean()) + 2.0 * wobble(4.025)
    wash = volts_from_db(wash_db) * rush(wash_colour, flicker_db=2.1, rate=30)
    return rumble + (low + ring) + wash + volts_from_db(hiss_db) * hiss


def swell():
    """Gain of the rumble: calm water, stirring under the foam, heaves."""
    heave_s, heave_db, _ = np.transpose(HEAVES)
    calm = volts_from_db(curves(np.concatenate(SEA))[0])
    gurgle_db = curves(np.concatenate(SURGES))[0]
    stir = during(SURGES) * volts_from_db(-41 + 0.74 * (gurgle_db - STRONG_DB))  # grows slower than the gurgle
    return calm + stir + humps(heave_s, heave_db, rise_s=0.15, fall_s=0.32)


def scene():
    """Apart from the uneven push, all reaches both microphones alike through the case."""
    slap = slaps()
    return sea() + surge() + crashes() + drain() + glugs() + ticks() + slap + ports(slap)


def top_cut(x):
    """Nothing passes above the cut-off."""
    return signal.sosfilt(signal.butter(12, 12130, fs=SR, output="sos"), x)


def record(dry):
    """Widening adds a side signal a quarter cycle ahead, part of it with scrambled phase; loud peaks clip."""
    # stereo width: (frequency [Hz], side over mid [dB])
    width = [(60, -31), (97, -5.5), (160, -3.5), (250, 2), (410, 7), (650, 10.5), (1060, 11.5),
             (1700, 11.5), (2750, 4.5), (4430, 4), (7150, -2), (11500, -2)]
    # looseness: (frequency [Hz], share of the side unrelated to the mid [0 to 1])
    looseness = [(40, 0.73), (150, 0.23), (500, 0.088), (1200, 0.26), (3000, 0.5), (6000, 0.41),
                 (10000, 0.9)]
    # balance: (frequency [Hz], left over right [dB])
    balance = [(60, 0), (170, -2), (490, -1), (1410, 0), (4030, -1), (11500, -2)]

    def loose_share(hz):
        return np.clip(along(looseness, hz), 0, 1)

    mid = filtered(dry.mean(0), lambda hz: 1 / (1 + (hz / 11200) ** 40))  # steep treble limit
    z = signal.stft(mid, nperseg=128)[2]
    scrambled = signal.istft(z * np.exp(2j * np.pi * rng.random(z.shape)), nperseg=128)[1][:N]
    loose = unit(scrambled) * np.std(mid)

    ahead = filtered(mid, lambda hz: 1j * volts_from_db(along(width, hz)) * np.sqrt(1 - loose_share(hz) ** 2))
    unrelated = filtered(loose, lambda hz: volts_from_db(along(width, hz)) * loose_share(hz))
    uneven_push = (dry[0] - dry[1]) / 2
    side = ahead + unrelated + uneven_push

    halves = np.array([[0.5], [-0.5]])  # each channel takes half of the imbalance
    pair = filtered(np.array([mid + side, mid - side]), lambda hz: volts_from_db(along(balance, hz) * halves))
    mix = np.clip(pair, -1, 1)
    return top_cut(mix)


dry = scene()
out = record(dry)
wav_out(out)
```